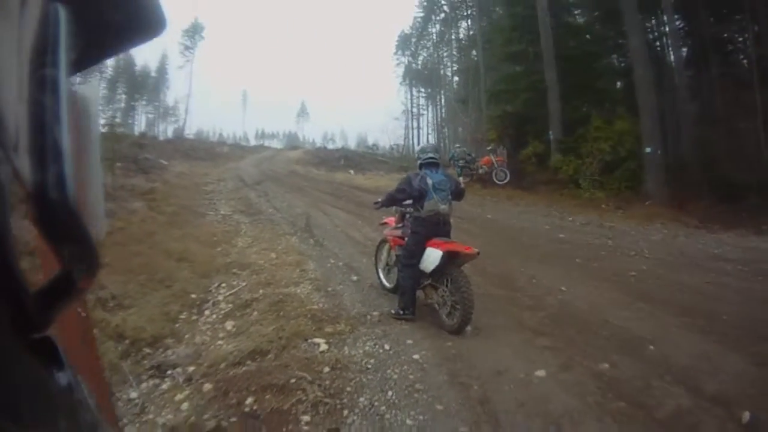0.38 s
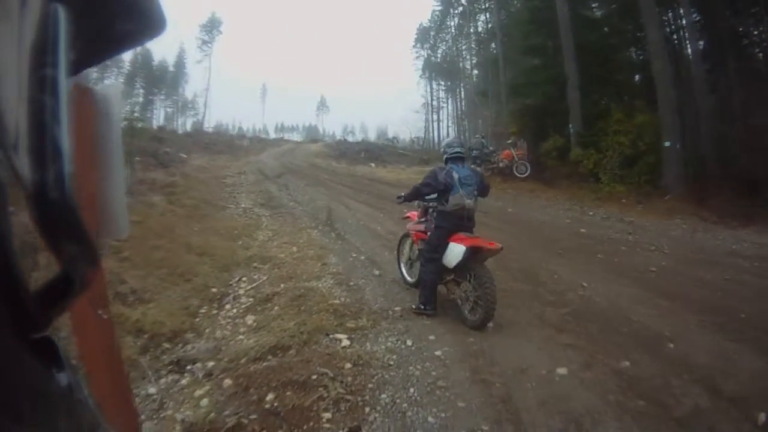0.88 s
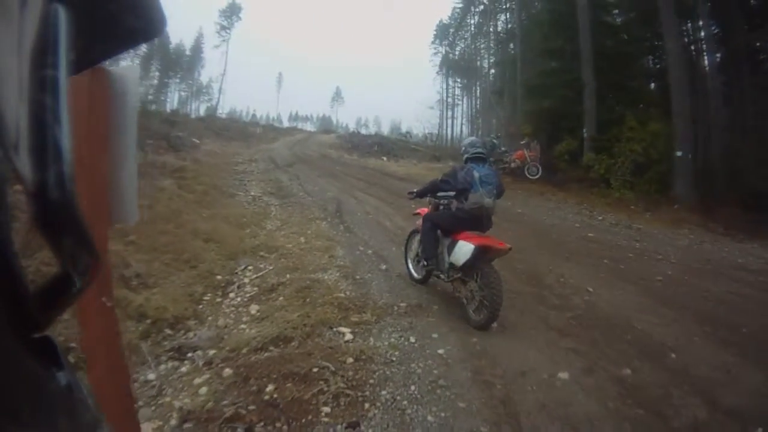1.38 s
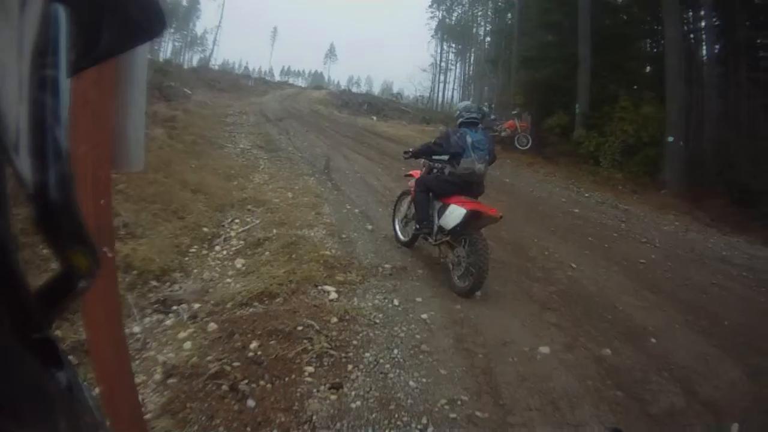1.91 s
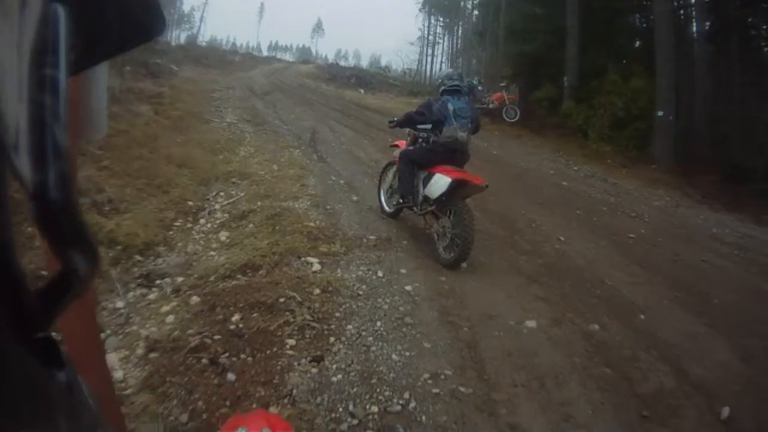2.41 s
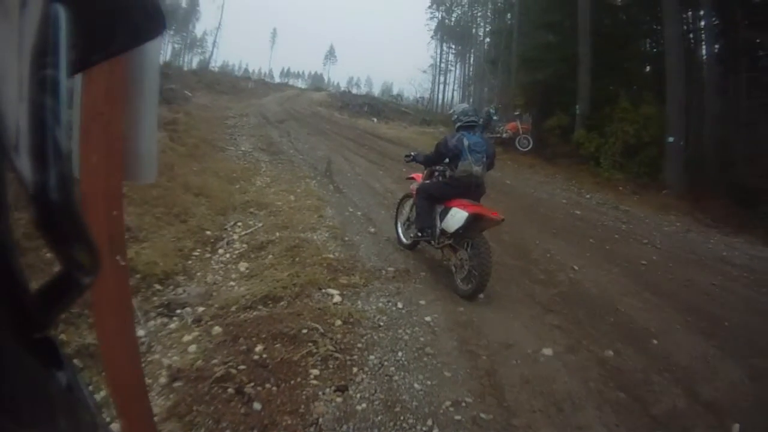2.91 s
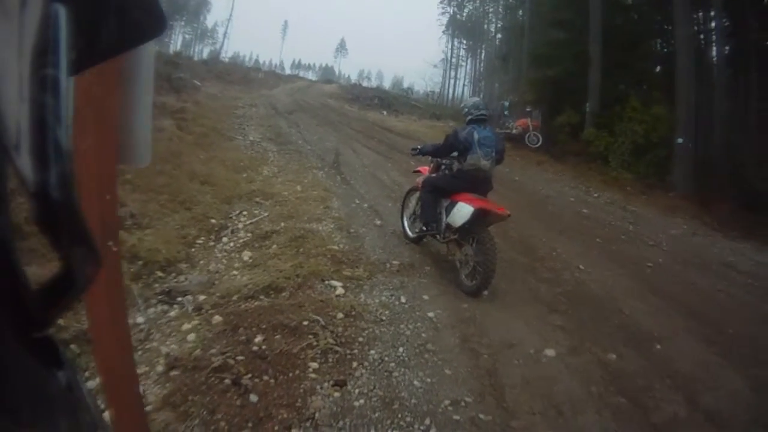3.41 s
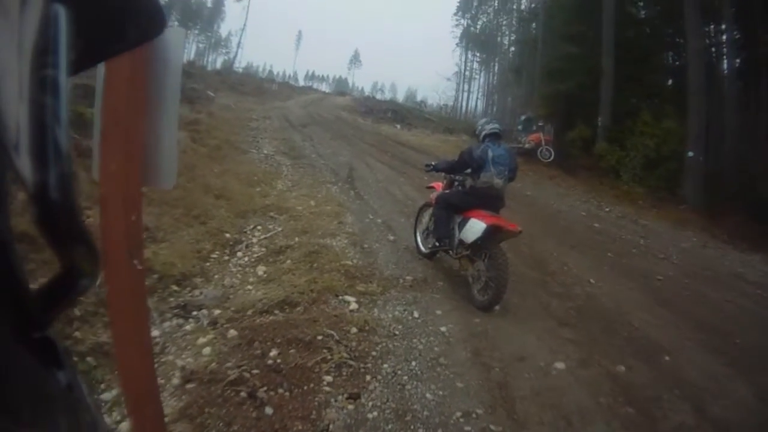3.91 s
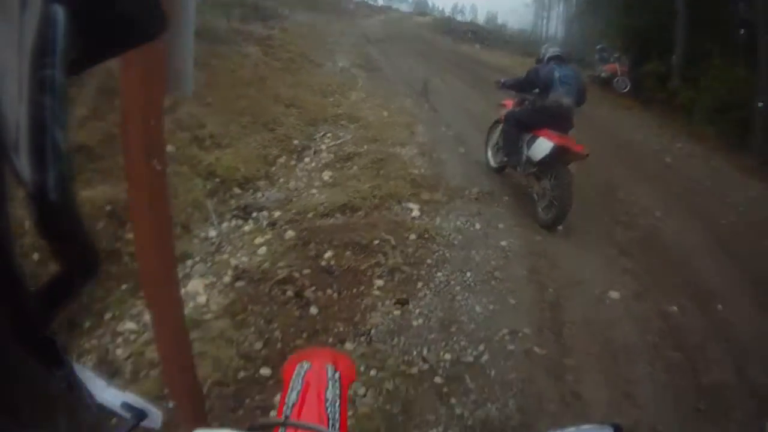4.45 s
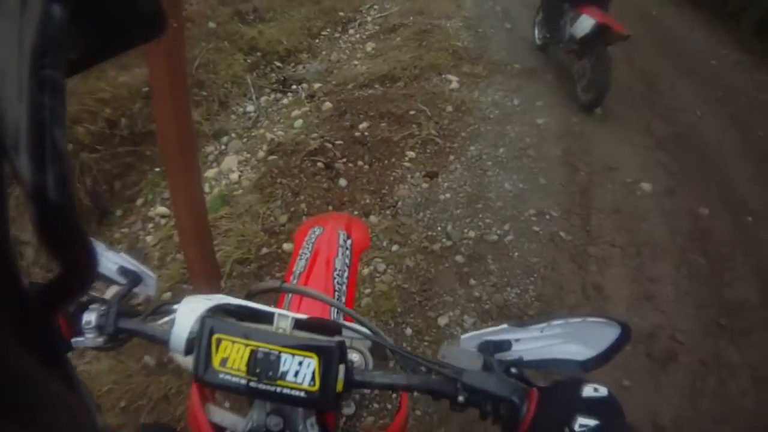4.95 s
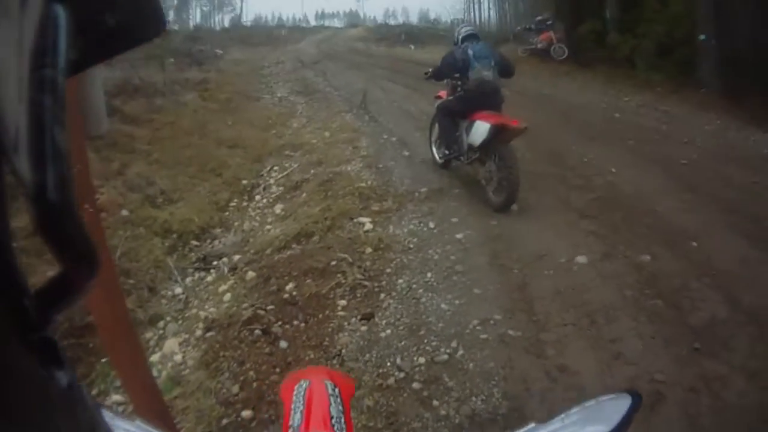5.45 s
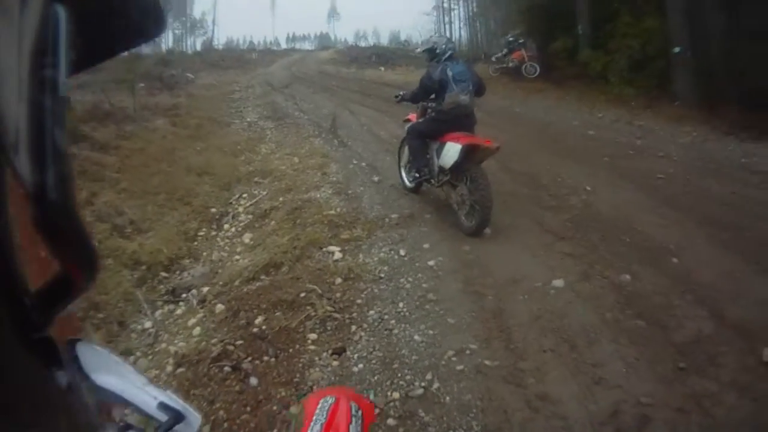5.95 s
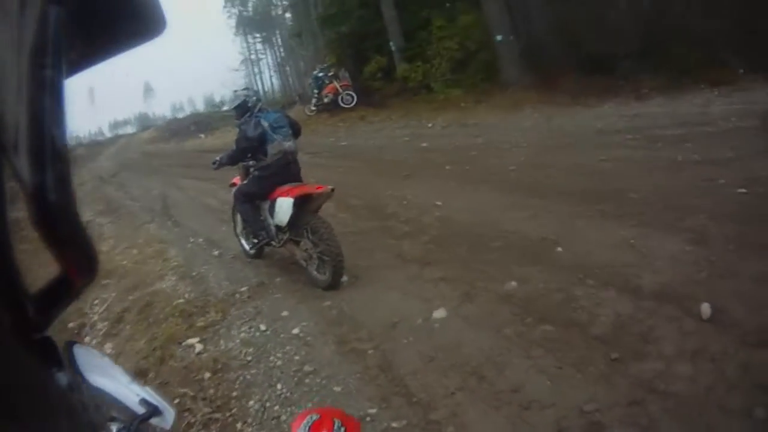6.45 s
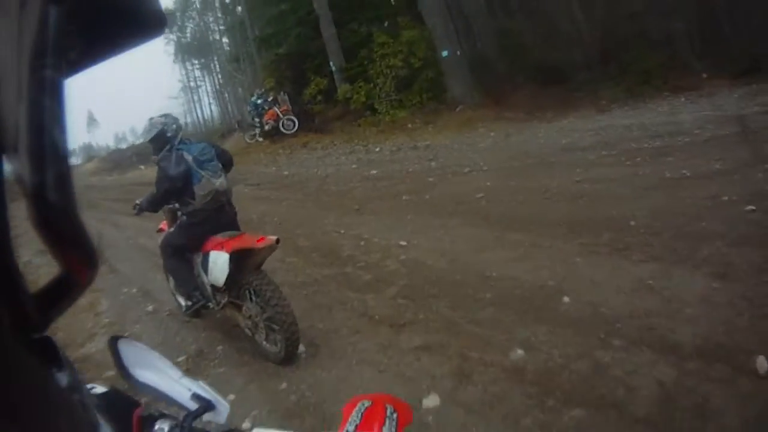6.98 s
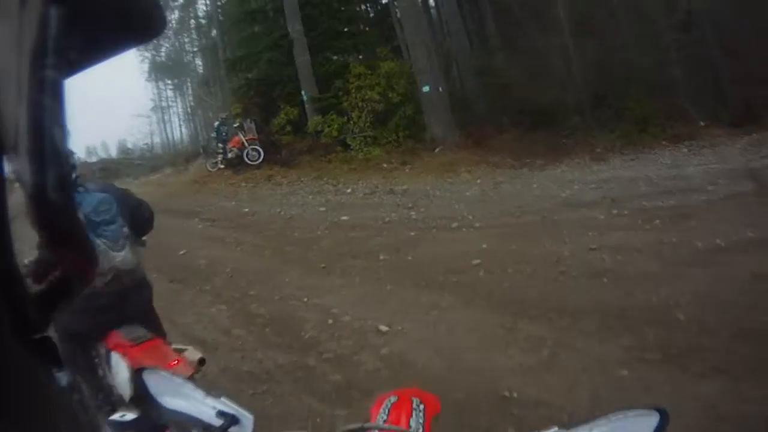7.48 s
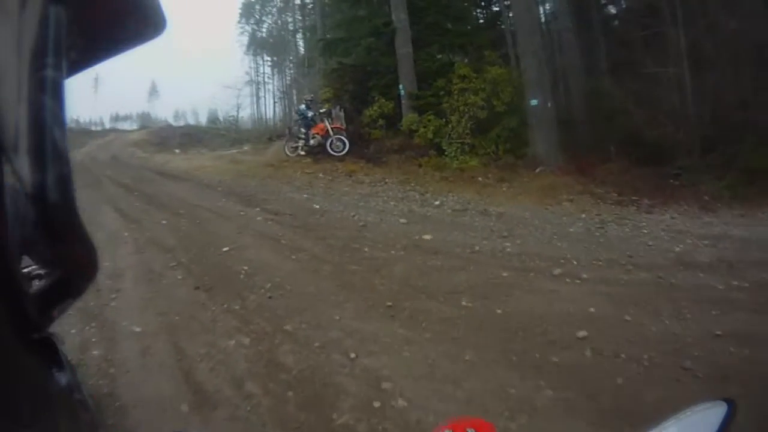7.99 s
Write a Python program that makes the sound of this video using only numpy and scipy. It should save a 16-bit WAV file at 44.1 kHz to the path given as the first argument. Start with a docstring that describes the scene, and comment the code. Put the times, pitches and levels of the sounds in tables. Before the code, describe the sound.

Heard muffled from the rider's helmet on an outdoor gravel track: another dirt bike putters softly ahead while a steel kick lever clacks and squeaks. The other bike blips twice. On a last kick the rider's own single-cylinder engine fires with a loud bark, settles into an uneven burble with metal clatter, then revs into hard, cracking blasts before falling back with pops and misfires.

```python
"""Kicking a dirt bike to life

A rider kicks a single-cylinder dirt bike to life and revs it, heard from the helmet inside a sealed housing.
Another bike idles ahead and is blipped twice: its firings ring resonances. The kick lever rings struck
steel; gated noise makes the metal clatter. Each own firing is a low boom, a ring and a steep crack,
repeated three times by bounces in the exhaust chamber. Breeze, a faint hiss and a whine lie behind.
"""
import sys
import numpy as np
from scipy import signal
from scipy.fft import rfft, irfft, next_fast_len
from scipy.io import wavfile
from scipy.ndimage import uniform_filter1d

SR = 44100
rng = np.random.default_rng(int(sys.argv[2]) if len(sys.argv) > 2 else 0)


def log_audio(samples):
    """Write samples as a 16-bit WAV file to the path given in sys.argv[1]."""
    # one column per channel
    frames = np.atleast_2d(samples).T
    # limit to full scale, then quantise
    limited = np.clip(frames, -1, 1)
    pcm = np.round(limited * 32767).astype(np.int16)
    wavfile.write(sys.argv[1], SR, pcm)


def gain_from_decibels(decibels):
    """Convert decibel values to linear amplitude factors."""
    exponent = np.asarray(decibels, float) / 20
    return 10 ** exponent


N = 357651  # samples, about 8.1 s


def unit(x):
    """Scales a sound to rms 1."""
    return x / np.sqrt(np.mean(x ** 2) + 1e-20)


def at_times(times_s, table):
    """Reads a table at given times: one row for each column after the time."""
    table_s, *columns = np.transpose(table)
    return [np.interp(times_s, table_s, column) for column in columns]


def curves(table):
    """Draws each column after the time as a smooth line of one value per sample."""
    return at_times(np.arange(N) / SR, table)


def filtered(x, response):
    """Multiplies the spectrum of x by a complex response of frequency."""
    size = next_fast_len(N + SR // 2)
    return irfft(rfft(x, size) * response(np.fft.rfftfreq(size, 1 / SR)), size)[:N]


def coloured(x, colour):
    """Shapes the spectrum of x by (pitch_hz, level_db) points read on a log axis, silent outside them."""
    pitch_hz, level_db = np.transpose(colour)

    def gain(hz):
        return gain_from_decibels(np.interp(np.log(hz + 1), np.log(pitch_hz), level_db, left=-120, right=-120))
    return filtered(x, gain)


def noise(colour):
    """Makes coloured noise of rms 1."""
    return unit(coloured(rng.standard_normal(N), colour))


def gated(gate, colour):
    """Lets noise through a gate, then colours it; rms 1 where the gate is 1."""
    white = rng.standard_normal(N)
    return coloured(gate * white, colour) / np.std(coloured(white, colour))


def blows(times_s, sizes):
    """Places single-sample impulses of the given sizes at the given times."""
    inside = times_s < (N - 1) / SR
    samples = np.round(times_s[inside] * SR).astype(int)
    return np.bincount(samples, sizes[inside], N)[:N]


def resonance(hz, centre_hz, width_hz):
    """Gives the response of one resonance, which is 1 at its centre."""
    return 1j * hz * width_hz / (centre_hz * centre_hz - hz * hz + 1j * hz * width_hz)


def rung(x, centre_hz, width_hz):
    """Passes a resonance twice: a dip, a peak of about 1 per unit impulse, then a dying ring."""
    return filtered(x, lambda hz: resonance(hz, centre_hz, width_hz) ** 2) * SR / (2 * width_hz)


def rung_noise(gate, modes):
    """Sends gated noise through a set of resonances, scaled to rms 1."""
    def response(hz):
        return sum(gain_from_decibels(db) * resonance(hz, centre_hz, width_hz) ** 2 for centre_hz, width_hz, db in modes)
    return unit(filtered(gate * rng.standard_normal(N), response))


def dying(x, t60_s):
    """Lets each impulse open a gate that shuts exponentially, by 60 dB in t60_s."""
    return signal.lfilter([1], [1, -gain_from_decibels(-60 / (t60_s * SR))], x)


def pushed(x, colour, lag, later_s=0, share=0):
    """Turns impulses into short coloured pushes of peak 1, their tones trailing by lag radians.

    Part of each push, given by share, pulls the phases as if it came later_s late."""
    def phase(hz):
        drag = np.angle(1 + share * np.exp(-2j * np.pi * hz * later_s))
        return np.exp(1j * (drag - lag))

    def shape(impulses):
        return filtered(coloured(impulses, colour), phase)
    return shape(x) / np.max(shape(blows(np.ones(1), np.ones(1))))


# steady faint microphone hiss: pitch_hz [Hz], level_db [dB per Hz]
HISS = [(6500, -10), (8000, 2), (12000, 1), (15700, -3)]


def hiss():
    """The microphone's own faint, steady noise."""
    return gain_from_decibels(-76) * noise(HISS)


def whine():
    """A faint electric whine: one steady, very high tone."""
    return gain_from_decibels(-84) * np.sin(2 * np.pi * 11988 * np.arange(N) / SR)


# strength of the breeze: time_s [s], level_db [dB]
BREEZE_LEVEL = [(0.0, -59), (1.81, -59), (3.07, -76), (3.45, -55), (4.02, -49), (4.29, -49), (5.71, -50),
                (5.92, -47), (6.5, -53), (7.07, -47), (7.54, -53), (8.11, -52)]
# slow air on the housing: pitch_hz [Hz], level_db [dB per Hz]
AIR_COLOUR = [(20, -4), (38, 12), (50, -34), (64, 19.5), (120, -20)]


def breeze():
    """Slow air presses on the housing: very low noise that swells and sinks."""
    return gain_from_decibels(curves(BREEZE_LEVEL)[0]) * noise(AIR_COLOUR)


# metal and gas noise through the housing: pitch_hz [Hz], level_db [dB per Hz]
METAL_COLOUR = [(530, -32), (900, -44), (1050, 4), (1150, 1.5), (1940, 7.5), (2470, 11), (2800, 1.5),
                (3030, 5.5), (3260, 0.5), (3910, 8), (5450, -11.5), (6000, -45), (7800, -39), (13200, -120)]
# runs of idle firings: first_s [s], firings [count], gap_s [s], growth_s [s added to each next gap]
IDLING = [(0.056, 11, .1093, .0005), (1.3, 4, .0543, 0), (1.585, 1, 0, 0), (1.874, 2, .058, 0),
          (2.261, 3, .113, 0), (2.69, 1, 0, 0), (3.022, 3, .113, -.01), (3.452, 1, 0, 0)]
# firings with their own strength, the two blips and a few strong idle ones: time_s [s], ring_db [dB]
STRONG_FIRINGS = [(1.704, -23.5), (1.949, -20.5), (2.001, -15), (2.039, -15), (2.074, -12), (2.1, -16.5),
                  (2.126, -12.5), (2.15, -16.5), (2.468, -21), (2.762, -19), (2.804, -15), (2.838, -14),
                  (2.866, -17), (2.892, -16), (3.347, -20.5)]


def bike_ahead():
    """Each firing rings the silencer and thumps low, with one late return; strong firings ring lower."""
    runs = []
    for first_s, firings, gap_s, growth_s in IDLING:
        k = np.arange(firings)
        runs.append(first_s + k * gap_s + k * (k - 1) / 2 * growth_s)
    idle_s = np.concatenate(runs)
    strong_s, strong_db = np.transpose(STRONG_FIRINGS)
    s = np.append(idle_s, strong_s)
    count = len(s)
    ring_db = np.append(-29 + 1.2 * rng.standard_normal(len(idle_s)), strong_db)
    strong = np.clip((ring_db + 26) / 6, 0, 1)  # 0 at -26 dB and below, 1 from -20 dB
    late_share = 0.65 + (0.066 - 0.65) * strong

    # first sounds, then their late returns
    both_s = np.concatenate([s + 0.0012, s + 0.013])
    size = np.concatenate([gain_from_decibels(ring_db), late_share * gain_from_decibels(ring_db)])
    both_strong = np.tile(strong, reps=2)
    weak_size = size * (1 - both_strong)
    ring = rung(blows(both_s, weak_size), 627, 178)
    ring = ring + rung(blows(both_s, size * both_strong), 494, 189)
    ring = ring + 0.15 * rung(blows(both_s, size), 392, 120)
    # broad middle of a weak firing, fainter in the return
    body_size = weak_size * np.repeat([1, .3], count)
    ring = ring + gain_from_decibels(-5.5) * rung(blows(both_s - .002, body_size), 336, 260)
    muffled = filtered(ring, lambda hz: 1 / (1 + (hz / 800) ** 8))

    chuff_size = gain_from_decibels(-46.5 + 1.5 * rng.standard_normal(count))
    chuff = gated(dying(blows(s - .004, chuff_size), 0.08), METAL_COLOUR)
    thump_size = (1 - 0.91 * strong) * gain_from_decibels(-42.5 + 2.0 * rng.standard_normal(count))
    thump = rung(blows(s + 0.00079, thump_size), 116.4, 29)
    return chuff + gain_from_decibels(-1.0) * muffled + thump


CATCH_S = 3.5885  # the firing that starts the own engine
# own crank, one firing a turn: time_s [s], speed [turns a second]
OWN_SPEED = [(3.6212, 40.27), (3.7, 41.79), (3.94, 29.68), (4.26, 36.08), (4.84, 35.99), (5.2, 33.81),
             (5.24, 35.36), (5.63, 33.02), (5.77, 40.96), (6.01, 40.95), (6.32, 43.94), (6.6, 40.54),
             (6.72, 36.74), (6.96, 33.19), (7.49, 31.93), (7.53, 25.79), (7.66, 28.12), (8.15, 27.29)]


def own_crank():
    """Counts the turns of the own crank since the first point of its speed curve."""
    running = np.arange(N) >= OWN_SPEED[0][0] * SR
    return np.cumsum(curves(OWN_SPEED)[0] * running) / SR


# modes of the own valve gear: pitch_hz [Hz], width_hz [Hz], level_db [dB]
VALVE_MODES = [(4850, 80, -10), (5120, 100, -10), (6080, 110, 0), (6340, 110, -9), (6830, 100, -11),
               (7710, 190, -14), (9550, 110, -16), (9800, 160, -15), (11100, 100, -19), (12050, 150, -18),
               (12600, 100, -23), (12900, 250, -21), (13300, 100, -22)]
# strength of the valve ticks: time_s [s], peak_db [dB, before each mode's own level]
VALVE_LEVEL = [(3.6, -71), (4.5, -64), (4.79, -48), (5.1, -53), (5.42, -54), (5.52, -64), (6.4, -56),
               (8.11, -74)]


def valve_ring(s):
    """Each closing valve rings the modes of its gear anew, each a little differently."""
    s = s[s > CATCH_S]
    tick_db = at_times(s, VALVE_LEVEL)[0]
    out = np.zeros(N)
    for pitch_hz, width_hz, mode_db in VALVE_MODES:
        scatter_db = 2.0 * rng.standard_normal(len(s))
        out += rung(blows(s, gain_from_decibels(tick_db + mode_db + scatter_db)), pitch_hz, width_hz)
    return out


# metal clatter of both engines: time_s [s], rattle_db [dB], sizzle_db [dB], before any gain with revs
CLATTER_LEVEL = [(0.0, -58, -70), (1.04, -59.5, -71), (1.2, -52.5, -62.5), (2.03, -52, -59),
                 (2.5, -55, -66), (2.87, -52, -60.5), (3.32, -55, -67), (3.55, -47, -58),
                 (3.68, -42.5, -51), (3.93, -48, -60), (4.61, -46, -59), (4.88, -45, -56.5),
                 (5.51, -44, -58.5), (6.1, -42, -53.5), (6.35, -41.5, -54), (7.1, -40.5, -55),
                 (7.23, -37.5, -53.5), (7.35, -41.5, -54), (7.7, -44.5, -58), (8.11, -44.5, -57)]
# thin top of the clatter: pitch_hz [Hz], level_db [dB per Hz]
SIZZLE_COLOUR = [(4800, -0.5), (6100, 7), (7200, 1), (8500, -4.5), (10000, -8.5), (12000, -9),
                 (15000, -12.5), (15750, -35)]
# engine cases ringing with the clatter: pitch_hz [Hz], width_hz [Hz], level_db [dB]
CASE_MODES = [(2530, 95, 3.5), (3810, 580, 4), (6330, 200, -9)]
# level of the cases against the rattle: time_s [s], level_db [dB]
CASES_LEVEL = [(0, 2), (3.5, -20), (4.5, -9), (4.9, 0), (5.4, -9), (6.2, -14), (8.11, -18)]
# gears of the bike ahead: pitch_hz [Hz], width_hz [Hz], level_db [dB]
WHIRR_MODES = [(4910, 130, -4), (5400, 150, -5), (5860, 230, -2), (6390, 250, 0), (7820, 150, -9),
               (8410, 200, -6), (8920, 120, -11)]


def clatter(ticks_s, pattern_db, above_idle, own):
    """Loose metal rattles at each tick over steady gear noise; cases ring along and valves tick."""
    scatter = rng.standard_normal(len(ticks_s))
    rattle_size = gain_from_decibels(pattern_db + 2.2 * scatter)
    sizzle_size = gain_from_decibels(1.6 * pattern_db + 2.5 * scatter)
    # the constant part is the steady gear noise
    rattle = unit(.36 + dying(blows(ticks_s, rattle_size), .06))
    sizzle = unit(.4 + dying(blows(ticks_s, sizzle_size), .06))
    rattle_db, sizzle_db = curves(CLATTER_LEVEL) + 0.1134 * above_idle  # dB per turn a second
    out = gated(gain_from_decibels(rattle_db) * rattle, METAL_COLOUR) + gated(gain_from_decibels(sizzle_db) * sizzle, SIZZLE_COLOUR)
    out = out + gain_from_decibels(rattle_db + curves(CASES_LEVEL)[0]) * rung_noise(rattle, CASE_MODES)
    out = out + valve_ring(ticks_s[pattern_db == 0])
    # the gears ahead whirr only until the own crank turns
    whirr_db = -78 + 0.8 * above_idle
    return out + gain_from_decibels(whirr_db) * (own == 0) * rung_noise(rattle, WHIRR_MODES)


# crank of the bike ahead: time_s [s], speed [turns a second]
AHEAD_SPEED = [(0, 18.08), (1.93, 18), (2.02, 26), (2.06, 30), (2.11, 39), (2.16, 40), (2.23, 33),
               (2.3, 29), (2.45, 18), (2.74, 20), (2.8, 26), (2.85, 35), (2.9, 38), (2.97, 36), (3.05, 31),
               (3.22, 18), (3.5, 18), (3.62, 30)]


def low_puffs(turn):
    """Once a turn a low puff rings, a little higher when revved, over some steady low noise."""
    s = np.flatnonzero(np.diff(np.floor(turn))) / SR
    revved = np.clip(at_times(s, AHEAD_SPEED)[0] / AHEAD_SPEED[0][1] - 1, 0, 1)
    size = gain_from_decibels((1.5 - revved) * rng.standard_normal(len(s)))
    puffs = rung(blows(s, size * (1 - revved)), 115, 70) + rung(blows(s, size * revved), 128, 70)
    return unit(puffs) + .25 * noise([(60, -8), (110, 0), (170, -16)])


# engine sound between the firings: time_s [s], puff_db [dB], wash_db [dB]
TICKOVER_LEVEL = [(0.0, -62, -54), (0.45, -47, -45.5), (0.9, -54, -55), (1.15, -44, -42.5),
                  (1.5, -63, -49.5), (1.77, -34, -37.5), (1.91, -56, -46.5), (2.03, -37, -34),
                  (2.12, -45, -38), (2.23, -42.5, -41), (2.4, -51.5, -44.5), (2.52, -40.5, -43),
                  (2.81, -41.5, -37.5), (2.98, -41.5, -39), (3.1, -46, -43.5), (3.25, -51, -42),
                  (3.45, -39.5, -39.5), (3.6, -40.5, -30), (3.75, -35, -36), (4.1, -45.5, -39),
                  (8.11, -37.5, -34.5)]
# exhaust sound scattered by ground and trees: pitch_hz [Hz], level_db [dB per Hz]
WASH_COLOUR = [(150, -71), (250, 7.5), (450, 11.5), (650, 11.5), (780, 2.5), (950, -4), (1300, -92)]


def tickover():
    """Each turn brings a puff, a valve tick and two weaker rattles; the own crank takes over once it runs."""
    own = own_crank()
    ahead_speed = curves(AHEAD_SPEED)[0]
    turn = np.cumsum(ahead_speed) / SR
    # the own valve tick, at 5/6 of a turn here, follows the firing by .3 of a turn
    own_turn = np.ceil(turn[own == 0][-1]) + own - .3 + 5 / 6
    turn = np.where(own > 0, own_turn, turn)

    third = np.floor(3 * turn + .5).astype(int)
    at = np.flatnonzero(np.diff(third))
    ticks_s = np.abs(at / SR + 0.0016 * rng.standard_normal(len(at)))
    pattern_db = np.array([-6, 0, -4])[(third[at] + 2) % 3]  # 0 is the valve tick
    above_idle = (ahead_speed - AHEAD_SPEED[0][1]) * (own == 0)  # turns a second

    puff_db, wash_db = curves(TICKOVER_LEVEL)
    lumps = unit(0.48 + dying(blows(ticks_s, gain_from_decibels(6.34 * rng.standard_normal(len(at)))), 0.054))
    wash = gated(gain_from_decibels(wash_db) * lumps, WASH_COLOUR)
    return gain_from_decibels(puff_db) * low_puffs(turn) + clatter(ticks_s, pattern_db, above_idle, own) + wash


# modes of the steel kick lever: pitch_hz [Hz], level_db [dB], t60_s [s to fall by 60 dB]
LEVER_MODES = [(2363, -3, .05), (3080, -4, .035), (3650, -1, .04), (3900, -4, .04), (4380, -8, .04),
               (5870, -18, .035), (6800, -17, .035), (8450, -24, .03), (10600, -25, .03), (11050, -27, .03)]


def lever_ring(times_s, levels_db):
    """Every contact rings the lever's steel modes anew, as dying sine tones."""
    out = np.zeros(N + SR)
    t = np.arange(SR // 10) / SR
    pitch_hz, mode_db, t60_s = np.transpose(LEVER_MODES)[:, :, None]
    modes = gain_from_decibels(mode_db - 60 * t / t60_s) * np.sin(2 * np.pi * pitch_hz * t)
    for s, db in zip(times_s, levels_db):
        scatter_db = 0.63 * rng.standard_normal(len(LEVER_MODES))
        out[round(s * SR):][:len(t)] += gain_from_decibels(db - 4 + scatter_db) @ modes
    return out[:N]


# squeaks of the lever pivot: start_s [s], length_s [s], level_db [dB], from_hz [Hz], to_hz [Hz]
SQUEAKS = [(1.33, 0.041, -49, 1320, 1450), (1.361, 0.046, -51, 1440, 1370),
           (1.524, 0.0226, -45.5, 1710, 1330), (1.783, 0.041, -43.5, 1670, 1280)]


def squeaks():
    """The lever pivot gives short sliding, slightly rough tones with a strong octave."""
    out = np.zeros(N)
    for start_s, length_s, level_db, from_hz, to_hz in SQUEAKS:
        u = np.linspace(0, 1, round(length_s * SR))
        pitch_hz = from_hz + (to_hz - from_hz) * u + 700 * rng.standard_normal(len(u))
        phase = 2 * np.pi * np.cumsum(pitch_hz) / SR
        tone = np.sin(phase) + 0.84 * np.sin(2 * phase)
        out[round(start_s * SR):][:len(u)] += gain_from_decibels(level_db) * np.sin(np.pi * u) * tone
    return out


# contacts of kick lever and frame: time_s [s], strength_db [dB], knock_db [dB against the strength],
# both before the mixing gains in kick()
CONTACTS = [(0.375, -64, -4), (0.39, -38, -1), (0.446, -53, -7), (0.458, -28, -1.5), (0.523, -38.5, 4),
            (0.598, -38.5, 2.5), (0.664, -50, 9), (0.995, -39, -2), (1.108, -41, -3), (1.1179, -28.5, -2),
            (1.137, -48, 6), (1.175, -45, -1), (1.292, -38, 5.5), (1.344, -42, -19), (1.361, -49, -10),
            (1.529, -58, -10), (1.609, -38, -6), (1.697, -36, -5), (1.709, -28.5, 3), (1.734, -38, -14),
            (1.823, -38, 4), (1.833, -46, -10), (1.917, -42, -9), (2.378, -60, -16), (2.5287, -37, 7.5),
            (2.6, -25.5, -3), (2.661, -35.5, 2), (3.191, -45.5, -5.5), (3.3682, -42, -11),
            (3.505, -28.5, -2), (5.087, -32.5, 7), (5.1, -44, 0), (5.112, -50, 0)]
# clack of the lever: pitch_hz [Hz], level_db [dB per Hz]
LEVER_COLOUR = [(530, -21), (900, -11), (1330, -14.5), (2120, -1.5), (2790, -4), (3110, 1), (5440, -13.5),
                (5980, -8.5), (7590, -11.5), (8550, -22.5), (9980, -16.5), (13400, -29), (15500, -33)]
# the kicked piston pumping air without firing: time_s [s], level_db [dB, before a gain of 3.5]
PUMP = [(0.429, -42), (0.521, -38.5), (1.134, -35), (1.191, -41), (1.73, -37), (1.773, -23), (1.82, -29),
        (1.853, -36), (2.534, -33.5), (2.618, -37), (2.648, -34.5), (3.538, -20.5), (3.551, -21),
        (3.57, -27), (3.608, -19.5), (3.634, -22)]


def kick():
    """The lever clacks on its stops, rings, squeaks, knocks the frame and pumps the piston."""
    s, strength_db, knock_db = np.transpose(CONTACTS)
    hit = uniform_filter1d(blows(s + .001, gain_from_decibels(strength_db)), size=132) * 33  # each contact lasts 3 ms
    clack = gated(dying(hit, 0.017) + 0.27 * dying(hit, 0.16), LEVER_COLOUR)
    knock = gated(dying(blows(s, gain_from_decibels(strength_db + knock_db - 4)), .12), WASH_COLOUR)
    pump_s, pump_db = np.transpose(PUMP)
    pump = rung(blows(pump_s, gain_from_decibels(pump_db + 3.5)), 247, 115)
    return 0.028 * clack + lever_ring(s, strength_db) + squeaks() + knock + pump


# how hard the own engine fires: time_s [s], ring_db [dB], crack_db [dB]
LOAD = [(3.59, -11, -10.5), (3.6212, -10.5, -5.5), (3.65, -10.5, -7), (3.67, -20, -39), (3.7681, -60, -55),
        (3.8512, -35, -45), (3.9459, -19, -36), (4.5, -20, -38), (4.9, -21, -60), (5.4945, -19.5, -41),
        (5.7, -14.5, -27), (6.0449, -12, -26), (6.25, -11.5, -13), (6.55, -10.5, -12.5), (6.65, -10, -10.5),
        (6.8, -15, -13.5), (7.3094, -12.5, -18), (7.4022, -15.5, -17), (7.4951, -17.5, -37),
        (7.6068, -19, -49), (7.7135, -19.5, -47), (7.822, -19.5, -57), (8.0397, -17, -49)]
# firings given their own strength, most failing: time_s [s], lost_db [dB, negative is a gain]
MISFIRES = [(3.851, -1), (3.918, 9), (3.979, 8), (4.583, 8.5), (4.704, 11), (4.777, 5), (4.833, 6.5),
            (4.889, 5.5), (5.037, 6), (5.176, 3.5), (5.471, 15), (5.554, 4), (7.532, 2.5), (7.569, 10),
            (7.75, 4.5), (7.792, 15), (7.871, 15), (7.939, 23), (7.995, 13), (8.075, 20)]


def own_firings():
    """Times and sizes of every firing; a lightly loaded engine fires unevenly and sometimes fails."""
    turn = own_crank()
    # firing times, each set 0.8 ms ahead of the counted turn
    firing_s = np.interp(np.arange(1e-4, turn[-1]), turn, np.arange(N) / SR) - .0008
    t = np.append(CATCH_S, firing_s)
    t = t + .00006 * rng.standard_normal(len(t))
    light = at_times(t, LOAD)[0] < -19.5  # ring level in dB
    shortfall_db = 1.5 * light * rng.exponential(size=len(t))
    db = 0.2 * rng.standard_normal(len(t)) - shortfall_db
    for when_s, lost_db in MISFIRES:
        db[np.argmin(abs(t - when_s))] = -lost_db
    return t, gain_from_decibels(db)


# steep front of a hard firing: pitch_hz [Hz], level_db [dB per Hz]
CRACK_COLOUR = [(700, 4), (950, 9), (1250, 9), (1600, 4), (2400, -2), (3100, -7), (4000, -13), (5500, -17),
                (9000, -21), (15700, -31)]
CRACK_LAG = -1.1  # radians by which its tones trail
# the exhaust spits as the throttle shuts: time_s [s], crack_db [dB]
POPS = [(7.583, -29), (7.606, -26), (7.622, -25.5), (7.653, -22), (7.658, -26), (7.681, -23),
        (7.706, -26.5)]


def pops():
    """The exhaust spits: single cracks, each shaking the metal into a short rattle."""
    s, crack_db = np.transpose(POPS)
    spit = blows(s, gain_from_decibels(crack_db))
    return pushed(spit, CRACK_COLOUR, CRACK_LAG) + gain_from_decibels(-15) * gated(dying(spit, 0.083), METAL_COLOUR)


# single hard fronts while the throttle opens: time_s [s], crack_db [dB]
SNAPS = [(5.727, -23), (5.85, -19), (5.923, -22), (6.07, -18.5)]
# steepness kept by the first return: time_s [s], level_db [dB]
RETURN_EDGE = [(6.1, -6), (6.24, 0), (6.54, 0), (6.61, -20), (6.85, -12), (7.1, -5)]


def cracks(t, when_s, share, size):
    """Steep fronts sit on the blows, trailed by turbulent gas; softer firings scatter more in steepness."""
    crack_db = at_times(t, LOAD)[1]
    soft_db = np.clip(-16 - crack_db, 0, 8)  # dB below a hard firing
    for moment_s, snap_db in SNAPS:
        nearest = np.argmin(abs(t - moment_s))
        crack_db[nearest] = snap_db
        soft_db[nearest] = 3
    # rows: the blow and its three returns; only early arrivals stay steep
    arrival_db = np.array([[0], [0], [-14], [-16]])
    firing_scatter_db = (1 + .3 * soft_db) * rng.standard_normal(len(t))
    arrival_scatter_db = 1.5 * rng.standard_normal((4, len(t)))
    front = share * gain_from_decibels(arrival_db + firing_scatter_db + arrival_scatter_db)
    front[1] *= gain_from_decibels(at_times(t, RETURN_EDGE)[0] - 2.2 * soft_db)
    front_s = when_s + .00035 + .00006 * rng.standard_normal(len(when_s))
    steep = blows(front_s, (front * size * gain_from_decibels(crack_db)).ravel())
    fizz = gated(dying(steep, .012), METAL_COLOUR)
    return pushed(steep, CRACK_COLOUR, CRACK_LAG) + gain_from_decibels(-29) * fizz


# echo patterns of the exhaust note, each named by the time in s at which it is first heard:
# delay_ms [ms after the blow], ring_share [of the blow's ring], boom_share [of its boom]
ECHOES_3_59 = [(4.2, .4, 0.39), (6.9, 0.88, 0.58), (10.4, 0.33, .5)]
ECHOES_3_67 = [(4.4, 0.22, 0.68), (8.3, .2, 0.25), (12.1, .16, 0.14)]
ECHOES_4_00 = [(5.3, 0.36, 0.54), (7.0, 1, 0.26), (10.6, 0.28, 0.77)]
ECHOES_4_66 = [(4.2, 0.47, 1), (6.3, 0.41, 1), (10.0, 0.86, 0.82)]
ECHOES_5_65 = [(4.1, 0.59, 0.71), (6.35, 0.8, 0.97), (10.3, 0.48, 0.2)]
ECHOES_5_78 = [(5.0, 0.16, 0.39), (6.9, 0.39, 0.085), (10.1, 1, 0.25)]
ECHOES_6_24 = [(4.9, 1, .55), (6.9, .25, .1), (10.0, .65, .25)]
# the note slides from one echo pattern to the next: time_s [s], returns [one of the tables above]
VOICING = [(3.65, ECHOES_3_59), (3.67, ECHOES_3_67), (3.86, ECHOES_3_67), (3.93, ECHOES_3_59),
           (3.96, ECHOES_3_59), (4.0, ECHOES_4_00), (4.56, ECHOES_4_00), (4.66, ECHOES_4_66),
           (5.4, ECHOES_4_66), (5.65, ECHOES_5_65), (5.78, ECHOES_5_78), (6.1, ECHOES_5_78),
           (6.24, ECHOES_6_24), (6.54, ECHOES_6_24), (6.61, ECHOES_5_78), (6.7, ECHOES_5_78),
           (6.85, ECHOES_5_65)]
# level of the low part of a blow: time_s [s], level_db [dB]
BOOM_LEVEL = [(3.6, -15), (3.72, -14), (3.86, -23), (3.94, -16.5), (5.5, -17), (5.8, -14), (6.4, -12.5),
              (7.0, -14.5), (7.5, -15.5), (8.1, -16)]
# low part of a blow: pitch_hz [Hz], level_db [dB per Hz]
BOOM_COLOUR = [(70, -51), (115, -12), (150, 15.5), (200, 11.5), (260, 15.5), (330, 11.5), (420, 5.5),
               (560, -15)]
# upper part, cut short by the housing: pitch_hz [Hz], level_db [dB per Hz]
RING_COLOUR = [(230, -21), (360, 10), (480, 18.5), (630, 16), (740, -6.5), (900, -11), (1100, -94)]


def own_exhaust():
    """Each blow leaves the pipe once and three more times after bouncing in the chamber."""
    t, size = own_firings()
    voicing_s = [s for s, _ in VOICING]
    voices = np.array([returns for _, returns in VOICING])
    slid = np.apply_along_axis(lambda column: np.interp(t, voicing_s, column), 0, voices)
    delay_ms, ring_share, boom_share = slid.transpose(2, 1, 0)
    when_s = np.concatenate([t, *(t + delay_ms / 1000)])

    # rows: the blow itself, then its three returns
    direct = np.ones(len(t))
    ring_share = np.array([direct, *ring_share]) * gain_from_decibels(1.0 * rng.standard_normal((4, len(t))))
    boom_share = np.array([direct, *boom_share])

    boom_size = boom_share * size * gain_from_decibels(at_times(t, BOOM_LEVEL)[0])
    ring_size = ring_share * size * gain_from_decibels(at_times(t, LOAD)[0])
    boom = pushed(blows(when_s, boom_size.ravel()), BOOM_COLOUR, lag=.4)
    # the pipe drags out the upper part of each blow
    ring = pushed(blows(when_s, ring_size.ravel()), RING_COLOUR, lag=.6, later_s=.002, share=.7)
    return boom + ring + cracks(t, when_s, ring_share, size) + pops()


def ground(x, t60_s):
    """Bike, track and bank scatter each blow into the same short tail."""
    t = np.arange(SR // 4) / SR
    tail = rng.standard_normal(len(t)) * gain_from_decibels(-60 * t / t60_s) * (t > .008)
    return signal.fftconvolve(x, tail / np.linalg.norm(tail))[:N]


def scene():
    """All sources, a faint hiss and an electric whine reach one microphone."""
    exhaust = own_exhaust()
    background = hiss() + whine() + breeze()
    engines = bike_ahead() + tickover() + exhaust + gain_from_decibels(-16.5) * ground(exhaust, 0.031)
    mono = background + engines + kick()
    return np.array([mono, mono])


def band_limit(x):
    """A steep low-pass at the top of the band."""
    return signal.sosfilt(signal.butter(12, 15720, fs=SR, output="sos"), x)


def record(dry):
    """The loudest blows are rounded off and the deepest bass is lost."""
    rounded = dry / (1 + np.abs(dry / .64) ** 5) ** (1 / 5)
    mix = np.array([filtered(channel, lambda hz: 1 / (1 + (30 / (hz + 1)) ** 4)) for channel in rounded])
    return band_limit(mix)


dry = scene()
out = record(dry)
log_audio(out)
```